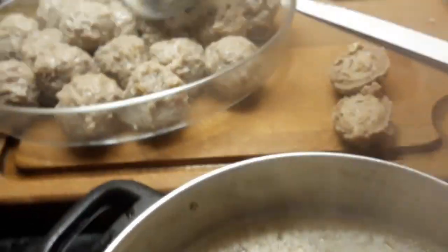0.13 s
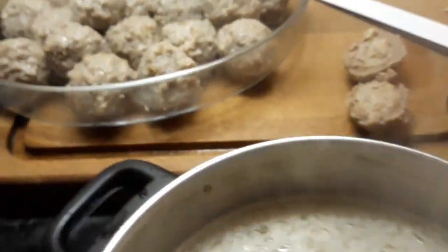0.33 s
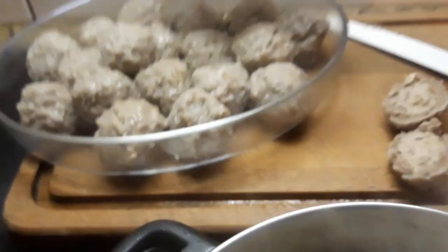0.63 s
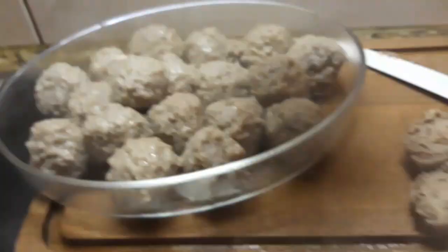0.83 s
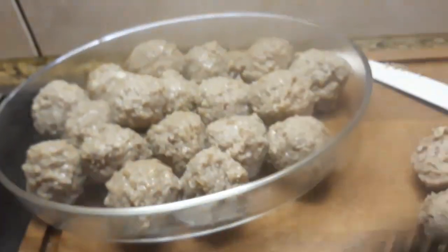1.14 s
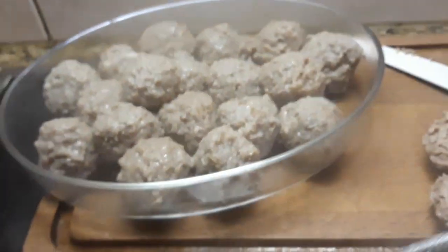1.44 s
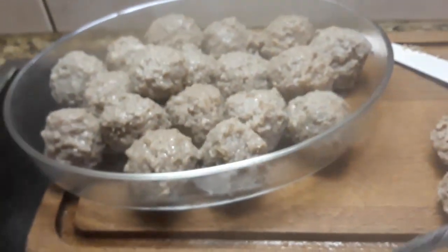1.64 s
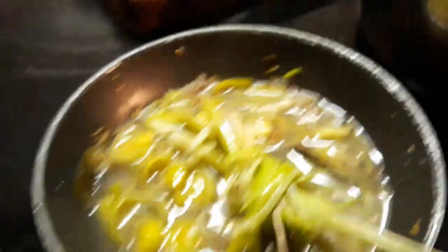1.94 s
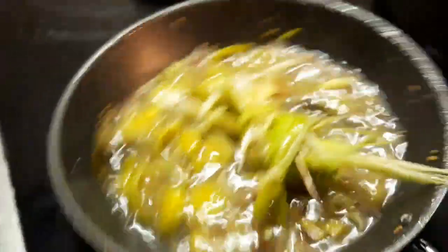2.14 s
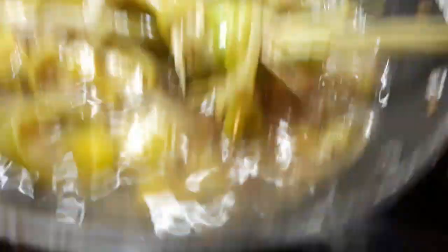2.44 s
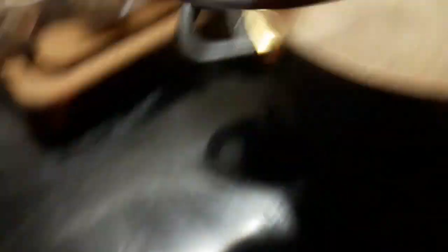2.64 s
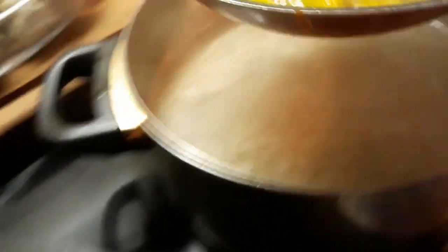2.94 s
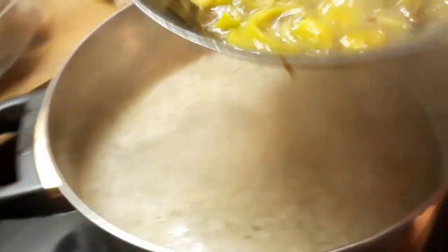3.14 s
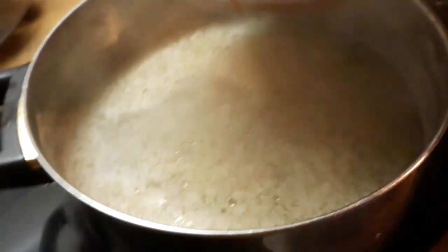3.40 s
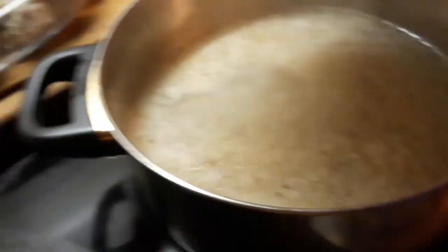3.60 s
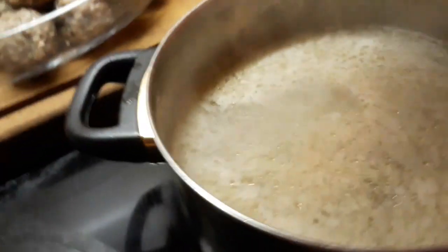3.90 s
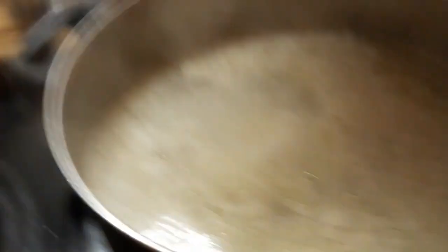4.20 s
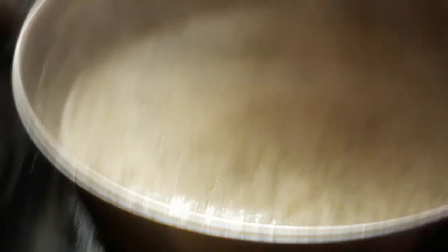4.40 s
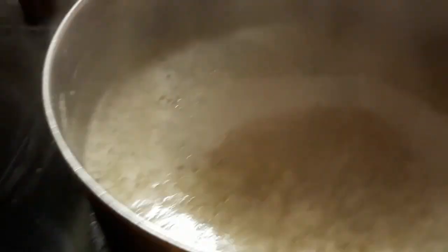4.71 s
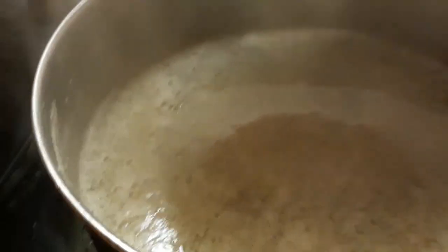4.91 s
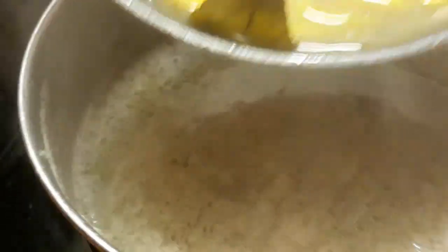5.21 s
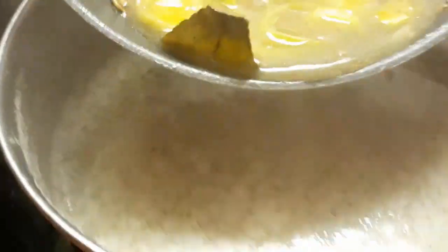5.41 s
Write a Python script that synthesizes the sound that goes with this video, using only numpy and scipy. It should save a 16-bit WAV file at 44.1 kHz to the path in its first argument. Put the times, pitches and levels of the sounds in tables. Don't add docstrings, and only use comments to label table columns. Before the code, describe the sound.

In a small hard tiled kitchen, a handheld microphone near the worktop catches quiet room tone and handling thumps, then a soft metallic knock and a much louder dry crack. After an abrupt cut, a distant lid rattles in quickening ticks over slipper shuffles, fading before one hard step. A pot simmers faintly, growing closer.

```python
import sys
import numpy as np
from scipy import signal
from scipy.fft import rfft, irfft
from scipy.io import wavfile
from scipy.ndimage import uniform_filter1d

SR = 44100
rng = np.random.default_rng(int(sys.argv[2]) if len(sys.argv) > 2 else 0)


def amplitude_ratio(level_db):
    exponent = np.asarray(level_db, float) / 20
    return 10 ** exponent


def int16_out(signal):
    q = np.round(np.clip(np.atleast_2d(signal).T, -1, 1) * 32767)
    wavfile.write(sys.argv[1], SR, q.astype(np.int16))


N = 244755
TIME = np.arange(N) / SR

# (frequency [Hz], density [dB/Hz])
AIR_COLOUR = [(30, -22), (45, -6.5), (70, -19.5), (100, -4.5), (140, 2.5), (170, -12.5), (250, -38.5)]
# (frequency [Hz], t60 [s])
ROOM_T60 = [(100, 0.88), (500, 0.45), (2000, .4), (6000, 0.33), (9000, 0.18), (14000, 0.27)]
# (time [s], loudness of the boil layers [dB])
POT_APPROACH = [(0.0, -48), (0.11, -52), (0.22, -60.5), (0.332, -64.5), (0.726, -64.5), (1.07, -71),
                (1.4, -65.5), (1.87, -58.5), (2.15, -58), (2.53, -57.5), (2.89, -52), (3.58, -53),
                (3.929, -54), (4.15, -48), (4.42, -57.5), (4.67, -50.5), (5.081, -55.5), (5.55, -55)]
# (frequency [Hz], density [dB/Hz])
POT_COLOUR = [(100, -36), (170, -13.5), (220, -6), (245, -8), (290, -1), (302, -2), (324, -7.5),
              (393, -1.5), (488, -9.5), (600, -14), (780, -46), (1320, -120)]
# (frequency [Hz], density [dB/Hz])
GURGLE_COLOUR = [(290, -12.5), (500, -6), (684, 4.5), (742, -2.5), (809, 3.5), (980, -2), (1190, -10.5),
                 (1360, -22.5), (2000, -30), (2600, -39), (4400, -120)]
# (frequency [Hz], density [dB/Hz])
RIM_COLOUR = [(1000, -29.5), (1260, -11), (1360, 3), (1470, -7), (1750, -34)]
# (frequency [Hz], density [dB/Hz])
WALL_COLOUR = [(2050, -30), (2330, -4), (2450, -1), (2600, -3.5), (2800, -36)]
# (frequency [Hz], density [dB/Hz])
HISS_COLOUR = [(880, -27), (1500, -4.5), (1720, -10.5), (2220, -8.5), (2500, -11), (2950, -16), (3500, -10),
               (4220, -9), (5190, -12.5), (5620, -12), (8170, -12), (9000, -21.5), (10200, -32.5),
               (12000, -18), (15200, -14), (15800, -22.5)]
# (time [s], peak [dB], pitch [Hz])
LOW_BUMPS = [(0.013, -48, 90.5), (0.131, -57, 80), (0.223, -63, 75), (2.037, -45, 125),
             (0.044, -50.5, 78.4), (0.074, -48.5, 62), (0.096, -43.5, 115), (0.253, -64, 90),
             (2.839, -43, 127), (2.89, -47, 118), (2.912, -41.5, 150), (2.931, -49, 75), (3.011, -50, 120),
             (5.082, -48, 96)]
# (time [s],
# peak [dB], pitch [Hz], length [cycles], edge [dB])
SMALL_CLICKS = [(.107, -42, 7900, 6.2, -14), (.197, -41, 6950, 14, -7), (.595, -51, 8180, 8.7, -11),
                (1.098, -44.5, 8150, 12, -15), (2.1265, -36, 12500, 2, -12), (2.409, -38, 7080, 104, -17),
                (2.407, -42, 3270, 38, -20), (2.845, -41, 11000, 4, -6), (2.967, -47, 10800, 6.5, -14),
                (3.186, -42.5, 13000, 2.5, 0), (3.484, -31, 8150, 8.5, -17), (3.521, -50, 12500, 3, -3),
                (3.853, -45, 10500, 6, -5), (4.06, -46.5, 1300, 4, -30), (4.263, -28.5, 1450, 7.8, -25),
                (4.2735, -25, 840, 1.4, -30), (4.282, -29.5, 608, 22, -30), (4.286, -28, 1720, 9.6, -30),
                (4.66, -38, 9250, 8.27, -8)]
# (start [s], hardest [s], end [s], level [dB], dull part [dB])
STROKES = [(0.0, 0, 0.16, -57, 7.5), (0.193, 0.198, 0.31, -62, -1), (0.198, 0.237, 0.36, -67, 15),
           (1.055, 1.09, 1.27, -66.5, -5), (1.187, 1.27, 1.34, -71.5, 6), (1.26, 1.33, 1.5, -72, 1),
           (1.549, 1.6, 1.88, -42, -7), (1.69, 1.8, 1.85, -49, 10), (1.756, 1.84, 2.07, -34.5, 2),
           (2.0, 2.04, 2.23, -60, -12), (2.07, 2.08, 2.17, -53, -9), (2.106, 2.17, 2.2, -46.5, -1.5),
           (2.165, 2.195, 2.31, -65, 2), (2.279, 2.408, 2.44, -57, -13), (2.393, 2.426, 2.3, -49.5, -15),
           (2.43, 2.497, 2.53, -58, -14), (3.5, 3.533, 4.3, -71, -12), (3.547, 3.614, 3.83, -61, 6),
           (3.76, 3.906, 3.98, -64, -21), (4.05, 4.118, 4.25, -57.5, 4.5), (4.224, 4.278, 4.42, -51.5, -11),
           (4.325, 4.379, 4.71, -49, -13), (4.4, 4.534, 4.75, -47, -0.5), (4.526, 4.623, 4.7, -51, -1),
           (4.678, 4.753, 5, -65.5, 3.5)]
# (frequency [Hz], density [dB/Hz])
SOLE_BRIGHT = [(1180, -24), (2000, -3.5), (2260, 1.5), (2980, 0.5), (4360, 3.5), (5220, -4.5), (7710, -1),
               (9900, -15), (11800, -10.5), (15100, -17), (15800, -28)]
# (frequency [Hz], density [dB/Hz])
SOLE_LOW = [(240, -53.5), (400, -24), (891, -3.5), (1070, 0), (1350, -3.5), (1570, -9.5), (1710, -2.5),
            (3000, -19.5), (3900, -47.5), (6600, -120)]
# (frequency [Hz], density [dB/Hz])
SIEVE_COLOUR = [(1180, -25), (2000, -4.5), (2570, -13.5), (2780, -2.5), (3160, -7), (3330, -1.5),
                (4280, -4.5), (4790, -13.5), (5360, -1), (5790, -16), (7580, -5), (8700, -7), (9990, -27.5),
                (15100, -17), (15800, -30.5)]
# (frequency [Hz], width [Hz], level [dB])
EDGE_BANDS = [(4250, 770, 1.5), (5460, 500, -2), (7900, 820, 0), (13000, 2000, -3.5)]
# (time [s], peak [dB], heel pitch [Hz], echo t60 [s], top of the rumble [Hz])
FOOTFALLS = [
    (2.0212, -40, 196, 0.058, 350),
    (2.0349, -28.5, 425, 0.28, 1160),
    (3.667, -43.5, 427, 0.4, 700),
    (4.058, -49, 519.3, 0.16, 1620),
    (4.0753, -48, 415, 0.14, 900),
    (4.1169, -32.5, 562, 0.15, 1654),
    (4.238, -18, 569, 0.38, 3500),
    (4.774, -48, 363, 0.16, 1113),
]
# (frequency [Hz], density [dB/Hz])
FLOOR_COLOUR = [(59, -41), (100, -4), (157, -22), (292, 2), (374, -1), (587, -4), (764, -6.5), (1450, -12),
                (1880, -14.5), (2200, -24), (9000, -49), (11700, -82), (19800, -120)]
# (time [s], peak [dB], flat landing: low modes [dB], crack [dB], rim modes [dB])
LID_TOUCHES = [(1.8725, -37.5, -1, 3.5, 1), (2.0684, -49, -13, 7, -9), (2.08, -51, -5, 1, 1),
               (2.24, -43, 1, 3.5, -6), (2.249, -50.5, -9, -3, 4), (2.392, -45.5, -10, -3, -4),
               (2.4109, -46.5, -21, 3.5, 8), (2.539, -39.5, -8.5, -3, 1), (2.548, -44.5, -10, 1.5, -6),
               (2.6666, -48.5, 3.5, 1, -3), (2.676, -51.5, 2.5, 0, -4), (2.789, -42.5, -3.5, 2.5, 0),
               (2.797, -46, 2, 0, 0), (2.8935, -48.5, -4, 2, -1.5), (2.901, -53, -10, -2, 0),
               (3.0038, -43, -10, 2.5, -3), (3.0931, -46, -1, -4, 0), (3.191, -47, -1, 1, 2),
               (3.266, -54.5, 2.5, -1, 3.5), (3.361, -46.5, -4, -8, 0), (3.42, -54, 5.5, -4, -2),
               (3.511, -51.5, -13, -0.5, 1), (3.6495, -58, 2, 5.5, 1.5), (3.7054, -60.5, -2, 2, 1),
               (3.7805, -58.5, -1, 2, -3.5)]
# (frequency [Hz], level [dB], t60 [s])
LID_RIM_MODES = [(6780, -10, .08), (7060, -3, .08), (7110, -2, .13), (7400, -12, .04), (8570, -9, .09),
                 (11500, -26, .04), (12100, -26, .04), (12900, -28, .03)]
# (frequency [Hz], level [dB], t60 [s])
LID_LOW_MODES = [(994, -5, 0.06), (1680, -11, 0.057), (2150, -24, 0.027), (2562, -4, 0.08),
                 (2555, -14.5, 0.022), (3444, -8, 0.051), (3540, -0.5, 0.041), (3940, -20, 0.044),
                 (4300, -9, 0.037)]
# (frequency [Hz], level [dB], t60 [s])
LID_PAIRED_MODES = [
    [(4870, 4, .045), (4700, -3, .04)],
    [(5750, 1, .05), (5800, 1, .07)],
]
# (frequency [Hz], density [dB/Hz])
LID_CRACK_COLOUR = [(800, -5), (1400, -4.5), (4200, -5), (4820, 4), (5400, -9), (7200, -5), (8800, -0.5),
                    (9600, -31), (11800, -6), (15800, -42)]
# (time [s], peak [dB], crack t60 [s], clatter t60 [s], ring [dB])
SIEVE_KNOCKS = [
    (1.424, -23.5, 0.04, 0.41, 1.5),
    (1.6481, -6, 0.016, 0.12, -8),
]
# (frequency [Hz], level [dB], t60 [s])
FIRST_BODY = [(123.4, -3.5, 0.13), (142.4, -7, 0.48), (221.5, -15, 0.22), (871, -9.5, 0.067),
              (1466, -8.5, 0.051), (1840, -11, .06), (2370, -16, 0.072), (3110, -17, 0.11),
              (3380, -9.5, 0.11), (4560, -12, 0.043), (5545, -16.5, 0.11), (5850, -11, 0.044),
              (7100, -10.5, .06), (7880, 0.5, 0.018)]
# (frequency [Hz], level [dB], t60 [s])
SECOND_BODY = [(113.6, -5.5, 0.28), (140.7, -6.5, 0.44), (366, -5, 0.18), (847, -8, 0.11), (964, 0, .06),
               (1293, -11, 0.07), (2422, -7, .05), (2760, -9, .05), (3180, -17, 0.056),
               (3876, -12.5, 0.064), (4590, -23.5, 0.17), (5136, -21.5, .12), (7250, -19, 0.0514)]
# (frequency [Hz], density [dB/Hz])
FIRST_CRACK = [(35, -32.5), (60, -5.5), (320, -2), (573, -26), (916, -12), (2700, -18.5), (3340, -12),
               (3840, -12), (7250, -15.5), (13400, -23.5), (16500, -30.5)]
# (frequency [Hz], density [dB/Hz])
SECOND_CRACK = [(35, -30.5), (280, -12), (480, -2.5), (1010, -5), (1500, -11), (3110, -7), (3840, -12),
                (6450, -16.5), (8150, -14), (10300, -34), (15400, -32.5), (16500, -52)]
# (time [s], peak [dB], t60 [s])
SETTLING = [
    (1.65, -8.5, .02),
    (1.655, -26, 0.027),
    (1.6605, -34, 0.012),
    (1.678, -48, 0.019),
    (1.779, -42, .02),
    (1.782, -34, .02),
]

CHANGE_S = (1.8665, 1.873)
NEAR_DB = -53
# (level [dB], share of the change in loudness they follow)
GURGLE_LAW, STEAM_LAW, AIR_LAW = (-61, 0.58), (-69, 0.3), (-64.5, 0.29)
RIM_S = (2.0, 2.398, 4.0, 4.95)
RIM_DB, FACING_DB, WALL_DB = (-91.5, -82, -84, -67), (-3.5, 0, -2, 2), (-93, -96, -78, -80.5)
HUM_HZ, HUM_DB = 51.5, -64.5
SHADOW_S, SHADOW_DB = (2.05, 2.25, 2.75, 3.2), -5
PRESS, EASE = 1.01, 1.43
GRIT_PER_S, GRIT_DB, GRIT_S = 580, 2, 0.003
SCRAPE_S, SCRAPE_DB = (2.125, 2.15, 2.178, 2.187), -51.5
FLOOR_TILT_DB, FLOOR_CUT_DB = 1.5, -48
DAMPING, DETUNE = 0.64, 0.0071
PAIR_DB, PAIR_SPREAD_DB = (-10.5, -8), 2.5
SHIVER_S = (2.05, 2.5, 3.95, 4.08)
SHIVER_DB, SHIVER_DB_PER_S = -64.5, -5


def evened(x):
    return x / np.sqrt(np.mean(x ** 2) + 1e-20)


def read(points, hz):
    f, value = np.transpose(points)
    return np.interp(np.log(hz + 1), np.log(f + 1), value)


def add(mix, s, sound):
    part = mix[round(s * SR):][:len(sound)]
    part += sound[:len(part)]


def above(x, hz):
    return signal.sosfilt(signal.butter(2, hz, "high", fs=SR, output="sos"), x)


def below(x, hz):
    return signal.sosfiltfilt(signal.ellip(8, .2, 70, hz, fs=SR, output="sos"), x)


def colour(x, points):
    gain = amplitude_ratio(read(points, np.fft.rfftfreq(len(x), 1 / SR)))
    return evened(irfft(rfft(x) * gain, len(x)))


def slow(hz, count):
    sos = signal.butter(2, hz, fs=SR, output="sos")
    return evened(signal.sosfilt(sos, rng.standard_normal(count)))


def patchy(points, depth_db, size=(8, 10)):
    z = signal.stft(rng.standard_normal(N), nperseg=512, noverlap=384)[2]
    patches = uniform_filter1d(rng.standard_normal(z.shape), size[0], 0)
    patches = evened(uniform_filter1d(patches, size[1], 1))
    noise = signal.istft(z * amplitude_ratio(depth_db * patches), nperseg=512, noverlap=384)[1]
    return colour(noise[:N], points)


def ring(modes, rise_s=0.0016, spread_db=0., luck=1, waver_db=0., size=22050):
    t = np.arange(size) / SR
    draws = luck * rng.standard_normal((len(modes), 2))
    waver = rng.standard_normal((len(modes), size // 100 + 1))
    waver = uniform_filter1d(waver, size=8, axis=1) * np.sqrt(8)
    waver_s = np.arange(waver.shape[1]) * 100 / SR
    y = np.zeros(size)
    for (hz, db, t60), (a, phase), w in zip(modes, draws, waver):
        level = db + spread_db * a - 60 * t / t60 + waver_db * np.interp(t, waver_s, w)
        y += amplitude_ratio(level) * np.sin(2 * np.pi * hz * t + phase)
    return y * (1 - np.exp(-t / rise_s))


def burst(points, t60, rise_s=0.004, size=22050):
    t = np.arange(size) / SR
    noise = colour(rng.standard_normal(size), points)
    return noise * amplitude_ratio(-60 * t / t60) * (1 - np.exp(-t / rise_s))


def resonate(x, hz, width):
    turn = np.exp(2j * np.pi * np.cumsum(hz) / SR)
    r = np.exp(-np.pi * width / SR)
    return 2 * (turn * signal.lfilter([1 - r], [1, -r], x / turn)).real


def grit():
    sizes = amplitude_ratio(GRIT_DB * np.minimum(rng.exponential(1, N), 3))
    catches = sizes * (rng.random(N) < GRIT_PER_S / SR)
    return evened(3.6 + signal.lfilter([1], [1, -np.exp(-1 / (GRIT_S * SR))], catches))


def nearness(at_db, share):
    boil_db = np.interp(TIME, *np.transpose(POT_APPROACH))
    return amplitude_ratio(at_db + share * (boil_db - NEAR_DB))


def air():
    shade = np.interp(TIME, SHADOW_S, (0, 1, 1, 0))
    tone = colour(rng.standard_normal(N), AIR_COLOUR)
    tone = nearness(*AIR_LAW) * amplitude_ratio(3.0 + SHADOW_DB * shade) * tone
    return amplitude_ratio(HUM_DB - 3.7 * shade) * np.sin(2 * np.pi * HUM_HZ * TIME) + tone


def room(x):
    taps = np.zeros(SR)
    at = np.arange(150, SR - 20, 20)
    taps[at + rng.integers(0, 20, len(at))] = rng.choice([-1., 1.], len(at))
    hz, t, z = signal.stft(taps, SR, nperseg=256)
    decay = amplitude_ratio(-60 * t / read(ROOM_T60, hz)[:, None])
    tail = signal.istft(z * decay, SR, nperseg=256)[1]
    return signal.fftconvolve(above(x, 170.0), tail / np.linalg.norm(tail))[:N]


def simmer():
    rim_db, facing_db, wall_db = (np.interp(TIME, RIM_S, db) for db in (RIM_DB, FACING_DB, WALL_DB))
    rim = amplitude_ratio(rim_db) * patchy(RIM_COLOUR, 1.0)
    wall = amplitude_ratio(wall_db) * patchy(WALL_COLOUR, 2.0)
    boil = nearness(NEAR_DB, 1) * patchy(POT_COLOUR, 0.61, size=(2, 12))
    gurgle = nearness(*GURGLE_LAW) * amplitude_ratio(facing_db) * patchy(GURGLE_COLOUR, 2.4, size=(3, 10))
    steam = nearness(*STEAM_LAW) * patchy(HISS_COLOUR, 1.5)
    return boil + gurgle + steam + rim + wall


def bumps():
    out = np.zeros(N)
    for s, db, hz in LOW_BUMPS:
        add(out, s, amplitude_ratio(db + 13.5) * ring([(hz, 0, 5.3 / hz)], 0.0022, luck=0, size=8192))
    return out


def clicks():
    out = np.zeros(N)
    for s, db, hz, cycles, edge_db in SMALL_CLICKS:
        tone = ring([(hz, 0, 3 * cycles / hz)], 0.00013, size=8192)
        edge = amplitude_ratio(edge_db) * burst(HISS_COLOUR, 0.013, 0.00087, size=8192)
        add(out, s, amplitude_ratio(db) * (tone + edge))
    return out


def slides():
    sieve = abs(TIME - 1.72) < .2
    cloth = patchy(SOLE_BRIGHT, 0.72)
    metal = patchy(SIEVE_COLOUR, 2.7, size=(5, 8))
    swish = amplitude_ratio(-6) * patchy(HISS_COLOUR, 1.2)
    bright = np.where(sieve, metal * grit(), (cloth + swish) * amplitude_ratio(0.77 * slow(150, N)))
    dull = patchy(SOLE_LOW, 2.0, size=(3, 10))
    sing_hz = np.where(sieve, 3570, 5170)
    sing_db = np.where(sieve, -3.5, -10.)
    sheen = bright + amplitude_ratio(sing_db) * evened(resonate(rng.standard_normal(N), sing_hz, 500.))
    out = np.zeros(N)
    for start, hardest, end, db, dull_db in STROKES:
        stroke = np.interp(TIME, (start, hardest, end), (0, 1, 0))
        stroke = stroke ** np.where(TIME < hardest, PRESS, EASE)
        stroke = stroke * ((TIME < CHANGE_S[0]) | (start > CHANGE_S[0]))
        out += stroke * amplitude_ratio(db) * (sheen + amplitude_ratio(dull_db) * dull)
    return out


def scrape():
    drive = rng.standard_normal(N) * grit()
    bands = np.zeros(N)
    for hz, width, db in EDGE_BANDS:
        curve = np.full(N, hz)
        bands += amplitude_ratio(db) * evened(resonate(resonate(drive, curve, width), curve, width))
    return amplitude_ratio(SCRAPE_DB) * np.interp(TIME, SCRAPE_S, (0, 1, 1, 0)) * bands


def steps():
    out = np.zeros(N)
    f = np.geomspace(FLOOR_COLOUR[0][0], FLOOR_COLOUR[-1][0], num=60)
    for s, db, hz, t60, top_hz in FOOTFALLS:
        level = read(FLOOR_COLOUR, f) + FLOOR_TILT_DB * np.log2(f / 500)
        level = level + FLOOR_CUT_DB * np.maximum(np.log2(f / top_hz), 0)
        heel = ring([(hz, 0, 6.2 / hz), (hz * 2.31, -12, 6.8 / hz)], 0.00084, luck=0)
        echo = ring([(hz * 0.927, 0, 37.0 / hz)], 0.00028, luck=0)
        rumble = burst(np.transpose([f, level]), t60, 0.0037)
        add(out, s - .0008, -amplitude_ratio(db + 17.0) * heel)
        add(out, s + 0.00937, amplitude_ratio(db - 1.5) * echo)
        add(out, s + 0.00205, amplitude_ratio(db - 6) * rumble)
    return above(out, 170.0)


def touched(modes):
    luck = rng.standard_normal((len(modes), 2))
    return [(hz * (1 + DETUNE * a), db, t60 * DAMPING * amplitude_ratio(0.7 * b))
            for (hz, db, t60), (a, b) in zip(modes, luck)]


def lid():
    out = np.zeros(N)
    pair_db = PAIR_SPREAD_DB * rng.standard_normal((len(LID_TOUCHES), 2)) + PAIR_DB
    for (s, db, low_db, crack_db, rim_db), (mid_db, upper_db) in zip(LID_TOUCHES, pair_db):
        touch = amplitude_ratio(rim_db) * ring(touched(LID_RIM_MODES), 0.0016, 2.5, waver_db=1.5, size=8192)
        touch += amplitude_ratio(low_db) * ring(touched(LID_LOW_MODES), 0.0007, 3.36, size=8192)
        touch += amplitude_ratio(mid_db) * ring(touched(LID_PAIRED_MODES[0]), size=8192)
        touch += amplitude_ratio(upper_db) * ring(touched(LID_PAIRED_MODES[1]), waver_db=2.0, size=8192)
        touch += amplitude_ratio(crack_db) * burst(LID_CRACK_COLOUR, 0.06, 0.0029, size=8192)
        add(out, s, amplitude_ratio(db + 1.5) * touch)
    shiver = np.interp(TIME, SHIVER_S, (0, 1, 1, 0))
    shiver = shiver * amplitude_ratio(SHIVER_DB + SHIVER_DB_PER_S * (TIME - SHIVER_S[1]))
    softer_hiss = [(f, db - 0.48 * np.log2(f / 3000)) for f, db in HISS_COLOUR]
    return out + shiver * (patchy(softer_hiss, 1.2) + amplitude_ratio(-7.0) * patchy(SOLE_LOW, 1.9))


def knocks():
    out = np.zeros(N)
    struck = zip(SIEVE_KNOCKS, (FIRST_BODY, SECOND_BODY), (FIRST_CRACK, SECOND_CRACK))
    for (s, db, t60, clatter_t60, ring_db), body, crack in struck:
        dull = [(f, level - 2.4 * np.log2(f / 1000)) for f, level in crack]
        snap = above(burst(crack, t60, 0.0002), 430.0)
        clatter = amplitude_ratio(-9) * above(burst(dull, clatter_t60, .002), 320.)
        ringing = amplitude_ratio(ring_db) * ring(body, 0.0016, luck=0, waver_db=2.6)
        add(out, s, amplitude_ratio(db) * (snap + clatter + ringing))
    for s, db, t60 in SETTLING:
        add(out, s, amplitude_ratio(db) * above(burst(SECOND_CRACK, t60, 0.00053), 600.))
    return above(out, 61.8)


def scene():
    first = np.arange(N) < CHANGE_S[0] * SR
    near = knocks() * first + clicks()
    feet = steps() + slides() + scrape()
    far = lid()
    direct = near + amplitude_ratio(-3.5) * feet + amplitude_ratio(-1.5) * far
    send = amplitude_ratio(-11.5) * near + amplitude_ratio(-14.0) * feet + amplitude_ratio(-4.5) * far
    wet = direct + first * room(send * first) + room(send * ~first)
    return (wet + bumps() + simmer() + air())[None]


def top_cut(x):
    return signal.sosfilt(signal.butter(12, 16840, fs=SR, output="sos"), x)


def record(dry):
    gap = uniform_filter1d(((TIME > CHANGE_S[0]) & (TIME < CHANGE_S[1])) * 1., size=24)
    x = below(above(dry, 42), 16700)
    body = below(x, 15850)
    loud = uniform_filter1d((abs(above(x, 2000)) > .09) * 1., size=600) > 0
    mix = (body + loud * (x - body)) * amplitude_ratio(-15 * gap)
    return top_cut(mix)


dry = scene()
out = record(dry)
int16_out(out)
```